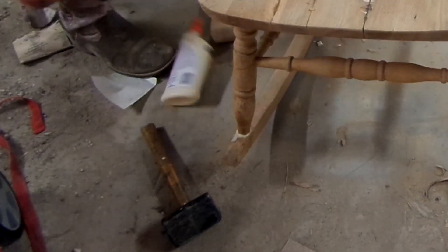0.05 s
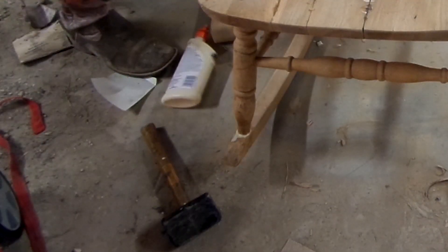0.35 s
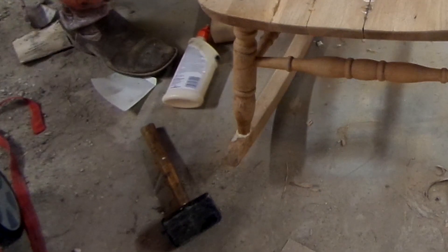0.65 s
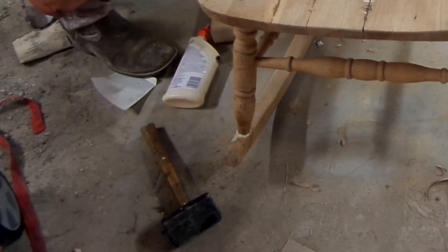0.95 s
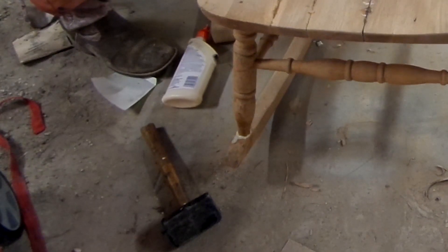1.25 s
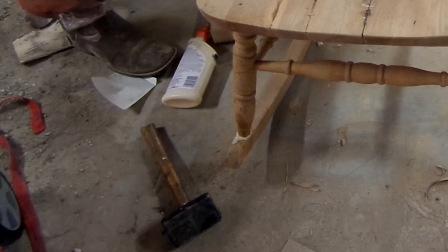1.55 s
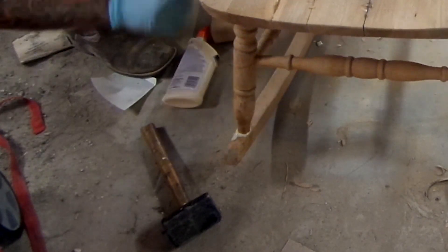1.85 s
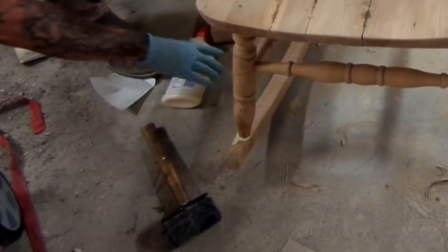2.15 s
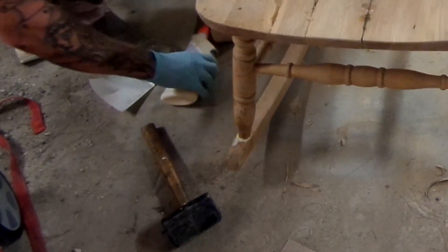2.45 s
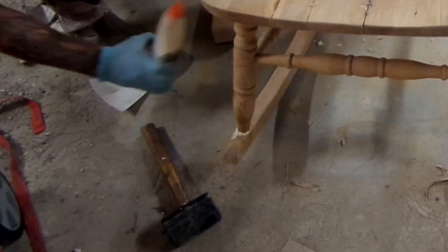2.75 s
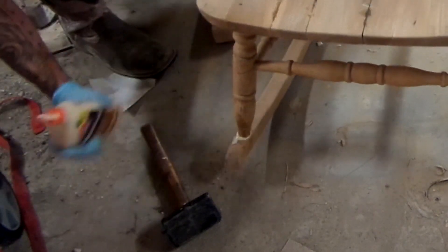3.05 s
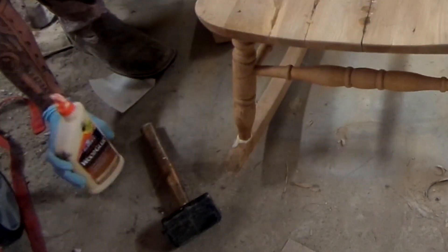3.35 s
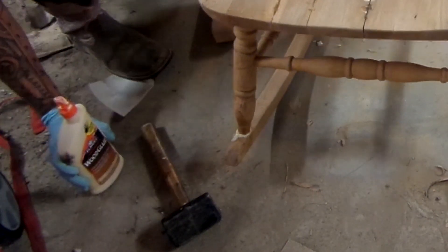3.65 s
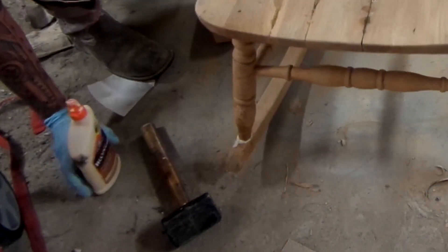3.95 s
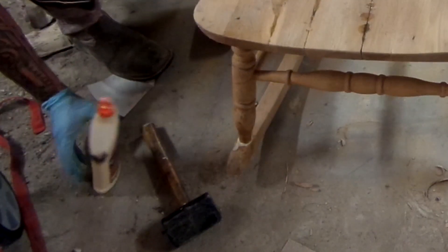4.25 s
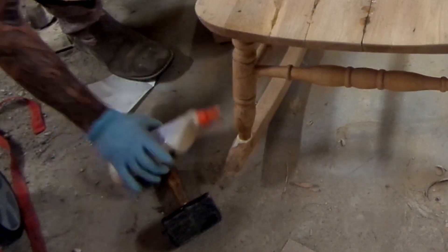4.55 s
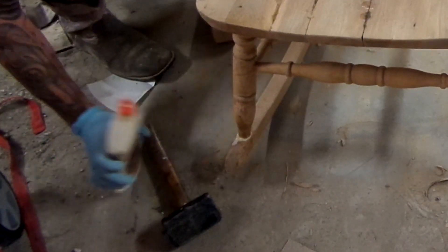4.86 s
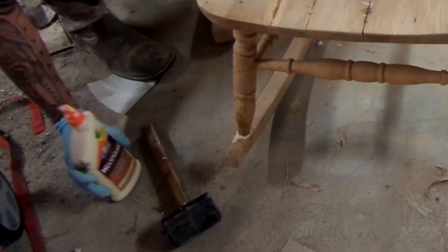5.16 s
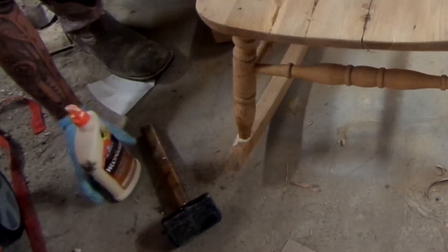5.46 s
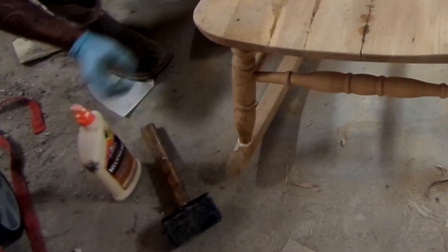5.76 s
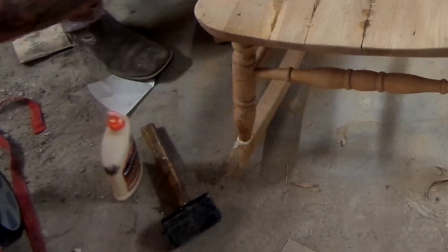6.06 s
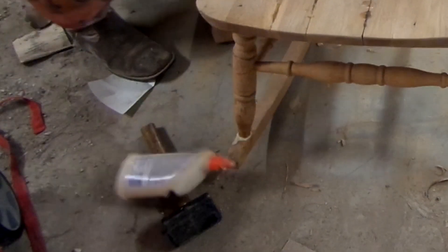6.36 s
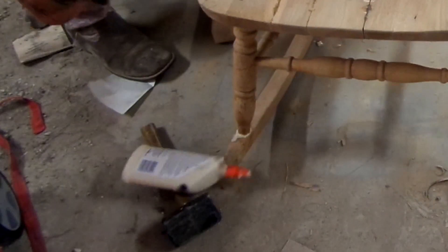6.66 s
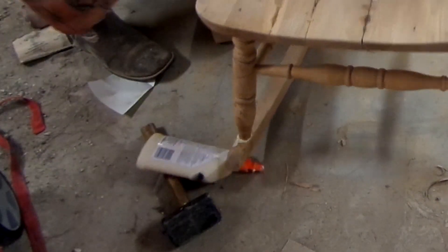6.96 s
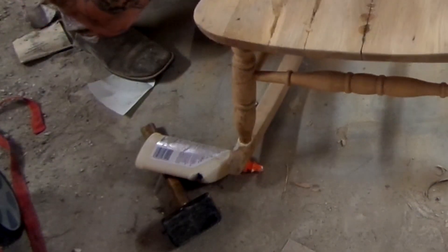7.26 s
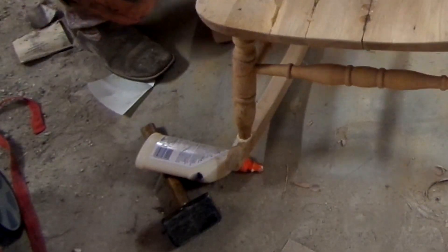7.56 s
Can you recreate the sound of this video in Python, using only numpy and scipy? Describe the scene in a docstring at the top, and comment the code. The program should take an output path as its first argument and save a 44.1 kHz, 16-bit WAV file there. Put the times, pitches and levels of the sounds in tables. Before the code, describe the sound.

A full plastic glue bottle drops on a concrete floor with a hollow thump and rocks to rest. A rubber glove and sleeve rub softly as it is picked up, with tiny gritty snaps. It is set down several times with sharp knocks, then topples onto a wooden mallet handle and clatters until still. The sounds are close, in a hard workshop with a short echo and a faint hum.

```python
"""A workshop with a concrete floor: a full plastic glue bottle drops and rocks, is picked up, is stood
down several times and finally topples onto a wooden mallet handle. Each blow flexes the filled body into
a hollow thump, rings the plastic wall and rim, and cracks on grit; the jolted mallet thuds dully.
A rubber glove and sleeves rub, glove, cap and grit snap, and the hard room rings over a faint hum."""
import sys
import numpy as np
from scipy import signal
from scipy.fft import rfft, irfft, next_fast_len
from scipy.io import wavfile

SR = 44100
rng = np.random.default_rng(int(sys.argv[2]) if len(sys.argv) > 2 else 0)


def inscribe(sig):
    """Save sig as 16-bit PCM at rate SR to the path in sys.argv[1].

    A 1-D sig is mono; a 2-D sig holds one channel per row.
    Samples are clipped to [-1, 1] before scaling.
    """
    pcm = np.round(np.clip(np.atleast_2d(sig).T, -1, 1) * 32767)
    wavfile.write(sys.argv[1], SR, pcm.astype(np.int16))


N = 343971
TIME = np.arange(N) / SR
EVENT_TIME = TIME[:SR * 3 // 4]  # the 0.75 s that one hit, stroke or room tail lasts


def undb(db):
    """Decibels to gain."""
    return 10 ** (np.asarray(db) / 20)


def unit(x):
    """Scale to rms 1."""
    return x / np.sqrt(np.mean(x ** 2))


def peak(x):
    """Scale to peak 1."""
    return x / np.max(np.abs(x))


def add(track, start_s, x):
    """Mix x into the track at its cue."""
    i = int(start_s * SR)
    track[i:i + len(x)] += x[:N - i]


def colour(x, curve):
    """Minimum-phase EQ through (frequency [Hz], gain [dB]) points."""
    size = next_fast_len(len(x) // 2 + 2048, True) * 2
    hz, db = np.transpose(curve)
    log_freq = np.log(np.fft.rfftfreq(size, 1 / SR) + 1)
    cepstrum = irfft(np.log(undb(np.interp(log_freq, np.log(hz), db))))
    # folding the cepstrum keeps the EQ from ringing ahead of a hit
    cepstrum[1:size // 2] *= 2
    cepstrum[size // 2 + 1:] = 0
    return irfft(rfft(x, size) * np.exp(rfft(cepstrum)), size)[:len(x)]


def band(x, lo_hz, hi_hz):
    """Second-order band-pass."""
    return signal.sosfilt(signal.butter(2, [lo_hz, hi_hz], "band", fs=SR, output="sos"), x)


def low_cut(x, hz):
    """Steep high-pass."""
    return signal.sosfilt(signal.butter(4, hz, "high", fs=SR, output="sos"), x)


def fade(t60):
    """Decay envelope that falls 60 dB in t60 seconds."""
    return np.exp(-np.log(1000) * EVENT_TIME / t60)


def damped_sine(hz, t60):
    """One mode ringing out."""
    return fade(t60) * np.sin(2 * np.pi * hz * EVENT_TIME)


def burst(t60):
    """A short crunch of noise."""
    return rng.standard_normal(len(EVENT_TIME)) * fade(t60)


def wander(rate_hz):
    """Smooth random modulation with a spread near 1."""
    steps = rng.standard_normal(int(N / SR * rate_hz) + 2)
    return np.interp(TIME * rate_hz, np.arange(len(steps)), steps)


# EQ of the still air: (frequency [Hz], gain [dB])
AIR_EQ = [(25, -25), (45, -13), (65, -6.5), (85, -10), (130, -11.5), (200, 0), (320, -11.5), (500, -8.5),
          (800, -16), (1500, -18.5), (3000, -20), (8000, -26.5), (16000, -26.5)]
# machine hum and thin whine: (centre [Hz], width [Hz], level [dB])
HUM_BANDS = [(121.9, 11, -61.5), (142.2, 6.5, -70), (501.7, 37, -68), (4095, 195, -67), (7270, 520, -70)]
def room_tone():
    """The bed: steady air, with narrow noise bands that waver as machine hum and whine."""
    air = undb(-56.5) * unit(colour(rng.standard_normal(N), AIR_EQ))
    hum = sum(undb(db) * unit(band(rng.standard_normal(N), hz - width / 2, hz + width / 2))
              for hz, width, db in HUM_BANDS)
    return air + hum


# cue list of bottle blows, shared by thumps, knocks and skids: (time [s], thump level [dB],
# thump pitch [Hz], hollow ring level [dB], wall level [dB], wall centre [Hz], rim level [dB],
# rim centre [Hz], crack level [dB])
BLOWS = [(0.0012, -11, 212, -20, -15.5, 1110, -18, 2200, -13),
         (0.029, -8, 216, -24.5, -20, 910, -28, 2340, -48),
         (0.1809, -27, 260, -22, -20, 800, -26, 1400, -21.5),
         (0.2646, -13.5, 222, -28.5, -24, 507, -46, 2200, -28.5),
         (0.2972, -26.5, 240, -25, -33, 560, -42, 1790, -25.5),
         (0.3513, -47, 212, -29, -41.5, 494, -59, 2200, -39),
         (0.714, -48, 238, -46.5, -41.5, 700, -59, 2200, -45),
         (1.221, -51, 199, -52, -42.5, 610, -51, 2200, -35.5),
         (2.55, -30, 205, -36, -36, 716, -65, 2200, -53),
         (3.4811, -22.5, 295, -29, -27, 670, -35, 2500, -23),
         (3.759, -64, 250, -62, -40.5, 805, -41, 2600, -37),
         (3.844, -66, 210, -70, -45, 760, -38, 3200, -33.5),
         (4.025, -54, 226, -69, -37, 1030, -41.5, 2600, -35),
         (4.5787, -23, 258, -22.5, -15, 840, -24.5, 1900, -5.5),
         (4.607, -17, 220, -22, -28.5, 650, -32, 1500, -40),
         (4.7006, -35, 288, -28.5, -31.5, 570, -36, 2700, -26),
         (5.0733, -33, 269, -39.5, -21, 760, -20, 3240, -18.5),
         (5.1135, -34, 231, -46, -28, 700, -50, 3370, -30),
         (5.195, -40, 266, -44, -43, 700, -46, 3400, -24),
         (5.942, -48, 190, -55, -44, 600, -42.5, 2400, -28.5),
         (6.4382, -24.5, 276, -52, -23.5, 600, -35, 2200, -26),
         (6.456, -13.5, 209, -30, -17.5, 730, -38, 2200, -13),
         (6.4768, -16.5, 211.5, -18, -30, 850, -23.5, 1550, -30),
         (6.5542, -42, 218, -24.5, -27, 630, -44, 1600, -24),
         (6.67, -38, 200, -31.5, -25, 610, -60, 1590, -36),
         (6.7529, -45, 250, -33.5, -37, 1100, -40, 1500, -29.5),
         (6.786, -36, 250, -30.5, -31, 480, -40, 1500, -45),
         (6.859, -24, 204, -20.5, -23, 1230, -42, 1300, -32),
         (6.9319, -19.5, 228.5, -31, -44, 485, -62, 3400, -45),
         (7.022, -38, 253, -49, -59, 600, -64, 1500, -52),
         (7.193, -54, 223, -43.5, -40, 900, -63, 1480, -63),
         (7.305, -45, 245, -49, -60, 600, -66, 1500, -36)]
# the filled bottle's lingering low modes: (frequency [Hz], relative level [dB], t60 [s])
BODY_MODES = [(188.2, -10.5, 0.5), (201.5, 1, .31), (223.4, -5.5, 0.42), (253.6, 0.5, 0.56),
              (281.6, -5.5, 0.17), (349.3, -9.5, 0.34), (421, -8.5, 0.31)]
def bottle_thumps():
    """Each blow flexes the glue-filled body for a few cycles and leaves its low modes ringing."""
    out = np.zeros(N)
    attack_s = 0.0025
    spot_db_per_octave = -10.5  # modes far from the pitch of the struck spot are excited less
    for start_s, thump_db, thump_hz, ring_db, *_ in BLOWS:
        thump = (1 - np.exp(-EVENT_TIME / attack_s)) * damped_sine(thump_hz, t60=0.125)
        hollow = sum(undb(db + spot_db_per_octave * abs(np.log2(hz / thump_hz))) * damped_sine(hz, t60)
                     for hz, db, t60 in BODY_MODES)
        add(out, start_s, undb(thump_db) * thump + undb(ring_db) * hollow)
    return low_cut(out, hz=179)


def contact(t60):
    """One hard click, with a crunch of grit 5 dB under it."""
    grit = burst(t60) * rng.exponential(size=len(EVENT_TIME))
    force = undb(-5) * grit / np.linalg.norm(grit)
    force[0] += 1
    return force


def strike(modes, scatter_db, detune):
    """Struck modes; each blow lands on another spot and shifts their balance and pitch."""
    out = np.zeros(len(EVENT_TIME))
    for k, (hz, db, t60) in enumerate(modes):
        gain = undb(db + scatter_db * rng.standard_normal())
        pitch_hz = hz * (1 + detune * rng.standard_normal())
        out += (-1) ** k * gain * damped_sine(pitch_hz, t60)
    return peak(out)


def plastic(modes, cycles):
    """Lossy plastic: every mode falls 60 dB in the same number of cycles."""
    return [(hz, db, cycles / hz) for hz, db in modes]


# modes of the plastic walls: (frequency [Hz], relative level [dB])
WALL_MODES = [(548, 7.5), (630, 6.5), (684, 5.5), (835, 6), (867, 7.5), (958, 2.5), (1063, 7.5),
              (1160, 12.5), (1220, 13), (1320, 8.5)]
# modes of the stiff rim and cap: (frequency [Hz], relative level [dB])
RIM_MODES = [(1555, 12.5), (1790, 11), (2010, 14), (2180, 9.5), (2305, 14), (2380, 10.5), (2800, 7),
             (3400, 7), (3570, 4.5)]
# EQ of the crack on the floor: (frequency [Hz], gain [dB])
CRACK_EQ = [(1500, -9), (3500, 6), (5500, 14.5), (8000, 5.5), (12000, -6), (16000, 5.5)]
def bottle_knocks():
    """Each blow knocks the bottle's wall, clacks its rim and cracks on the gritty floor."""
    out = np.zeros(N)
    for start_s, *_, wall_db, wall_hz, rim_db, rim_hz, crack_db in BLOWS:
        wall = strike(plastic(WALL_MODES, cycles=21.3), scatter_db=3.5, detune=0.0061)
        wall += undb(-1) * peak(band(contact(t60=0.015), 470, 2250))
        rim = strike(plastic(RIM_MODES, cycles=67), scatter_db=1.0, detune=0.0067)
        rim += undb(9) * peak(band(contact(t60=0.045), 1700, 4800))
        # the struck spot favours the modes around one pitch
        wall = peak(colour(wall, [(wall_hz / 2, -5), (wall_hz, 0), (wall_hz * 2, -9)]))
        rim = peak(colour(rim, [(rim_hz / 1.5, -12), (rim_hz, 0), (rim_hz * 1.5, -12)]))
        crack = peak(colour(contact(t60=0.043), CRACK_EQ))
        add(out, start_s, undb(wall_db) * wall + undb(rim_db) * rim + undb(crack_db) * crack)
    return out


def friction(eq, grain_db, flutter_db=1.8):
    """Dense micro-slips of unequal size, coming in uneven spurts."""
    slips = rng.standard_normal(N)
    slips *= undb(grain_db * np.minimum(rng.exponential(size=N), 2 * np.pi))
    return unit(colour(slips, eq)) * undb(flutter_db * wander(rate_hz=120))


def shifting_contact(hiss, tilt_db):
    """As the contact patch moves, the hiss swings between duller and brighter."""
    bright = signal.sosfilt(signal.butter(1, 7500, "high", fs=SR, output="sos"), hiss)
    tilt = undb(tilt_db * wander(rate_hz=28))
    return bright * tilt + (hiss - bright) / tilt


# bright EQ of grit ticks and snaps: (frequency [Hz], gain [dB])
SNAP_EQ = [(1000, -24), (3500, -10), (6000, -2), (10000, 0), (16000, 0)]
def grit_ticks(per_second):
    """Grains of grit catch as sparse bright ticks of unequal size."""
    catches = (rng.random(N) < per_second / SR) * rng.standard_normal(N)
    tick = peak(colour(burst(t60=0.002), SNAP_EQ))
    return signal.fftconvolve(catches, tick)[:N]


# fader curve of the sleeve's rustle as the arm moves: (time [s], level [dB])
SLEEVE_FADER = [(0.45, -77), (0.82, -69), (3.57, -57.5), (4.59, -93), (4.75, -59.5), (5.46, -61),
                (5.71, -71), (6.28, -63), (6.48, -68), (6.75, -58.5), (6.99, -61), (7.5, -61)]
# glove over bottle, bottle over floor: (time [s], length [s], hiss level [dB], scrape level [dB])
RUB_STROKES = [(0.05, .04, -42, -42), (0.71, .04, -55, -53), (0.81, .19, -55, -72), (1.38, .13, -56, -58),
               (1.59, .05, -55, -65), (1.712, .04, -46, -52), (1.78, .16, -55, -62), (2.0, .08, -54, -55),
               (2.235, .03, -56, -53), (2.42, .21, -45, -51), (3.31, .04, -48, -57), (3.38, .14, -48, -56),
               (3.53, .07, -52, -52), (3.775, .07, -62, -54), (3.91, .12, -54, -65), (4.1, .11, -57, -74),
               (4.62, .09, -46, -47), (4.812, .035, -40.5, -41), (5.02, .04, -41, -48),
               (5.285, .05, -47, -45), (5.41, .08, -51, -58), (5.57, .05, -55, -63), (6.255, .14, -49, -58),
               (6.56, .11, -42, -50), (6.77, .05, -46, -52), (6.91, .03, -48, -48), (7.11, .15, -54, -61),
               (7.515, .09, -55, -66)]
# EQ of light rubbing: (frequency [Hz], gain [dB])
HISS_EQ = [(1000, -24), (3000, -9), (5500, 0), (8000, -1), (11000, 0), (16000, -1)]
# EQ of pressed rubbing: (frequency [Hz], gain [dB])
SCRAPE_EQ = [(60, -50), (250, 5), (600, -3), (1100, -4.5), (2400, -1.5), (3500, -2), (5500, -9.5),
             (12000, -20.5)]
def rubbing():
    """Friction: the sleeve only hisses; strokes and skids press harder and also scrape lower down."""
    hiss_env = undb(np.interp(TIME, *np.transpose(SLEEVE_FADER)))
    scrape_env = np.zeros(N)
    swell_share, sag_db, release_s = 0.51, -5.5, 0.047
    for start_s, length_s, hiss_db, scrape_db in RUB_STROKES:
        swell = np.minimum(EVENT_TIME / (swell_share * length_s), 1)
        pressure = undb(sag_db * (np.minimum(EVENT_TIME / length_s, 1) - .5))
        release = np.exp(-np.maximum(EVENT_TIME - length_s, 0) / release_s)
        stroke = swell * pressure * release
        add(hiss_env, start_s, undb(hiss_db) * stroke)
        add(scrape_env, start_s, undb(scrape_db) * stroke)
    # every blow skids briefly on the grit, well under its crack
    skid = np.exp(-EVENT_TIME / 0.029)
    for start_s, *_, crack_db in BLOWS:
        add(hiss_env, start_s, undb(crack_db - 25) * skid)
        add(scrape_env, start_s, undb(crack_db - 24) * skid)
    hiss = shifting_contact(friction(HISS_EQ, grain_db=3.0), tilt_db=3.0)
    hiss += undb(7.5) * grit_ticks(per_second=28)
    scrape = friction(SCRAPE_EQ, grain_db=0.5)
    return hiss_env * hiss + scrape_env * scrape


# small sharp snaps of glove, cap and grit: (time [s], snap level [dB], clack level [dB])
SNAP_CUES = [(0.0567, -15, -37), (0.083, -26, -44), (0.606, -38, -38), (0.7218, -42, -39),
             (1.385, -31.5, -51), (1.899, -35, -50), (2.067, -50, -56), (2.2393, -25, -16.5),
             (2.46, -30, -33), (3.3252, -17.5, -30.5), (4.8433, -23.5, -20.5), (5.0435, -19.5, -36),
             (5.1137, -31, -21.5), (5.2725, -46, -27), (5.3, -35, -21.5), (5.511, -28, -47),
             (5.758, -34.5, -53), (5.901, -28, -57), (6.042, -34, -54), (6.2485, -29, -56),
             (6.2855, -24.5, -49), (6.584, -25, -27), (6.913, -18, -27.5)]
# EQ of the plastic's clack: (frequency [Hz], gain [dB])
CLACK_EQ = [(100, -22), (350, -3), (620, 2), (1200, -4), (2000, -3), (2900, -2), (4200, -4.5), (8000, -12),
            (16000, -20)]
def handling_snaps():
    """Glove, cap and grit give tiny bright snaps, each layered with a clack of the plastic."""
    out = np.zeros(N)
    for start_s, snap_db, clack_db in SNAP_CUES:
        snap = peak(colour(burst(t60=0.007), SNAP_EQ))
        clack = peak(colour(contact(t60=0.007), CLACK_EQ))
        add(out, start_s, undb(snap_db) * snap + undb(clack_db) * clack)
    return out


# the thin ring heard at the lift: (centre [Hz], level [dB], t60 [s])
LIFT_TONE = (2363, -48, 0.42)
def lift_ring(start_s):
    """A narrow band of noise rings faintly as the bottle comes up."""
    out = np.zeros(N)
    hz, db, t60 = LIFT_TONE
    add(out, start_s, undb(db) * peak(band(burst(t60), hz - 50, hz + 50)))
    return out


# the bottle jolts the mallet against the floor: (time [s], level [dB])
MALLET_JOLTS = [(4.58, -34.5), (4.623, -34), (6.459, -31.5), (6.672, -35), (6.754, -37)]
# the mallet's dull modes: (frequency [Hz], relative level [dB], t60 [s])
MALLET_MODES = [(48, -15, .3), (66, -5, .3), (90, -3, .2), (122, -3, .25), (145, 0, .3)]
def mallet_thuds():
    """The heavy mallet rocks on the concrete with a dull thud."""
    out = np.zeros(N)
    for start_s, db in MALLET_JOLTS:
        thud = strike(MALLET_MODES, scatter_db=7.0, detune=0.033)
        add(out, start_s, undb(db) * low_cut(thud, hz=50))
    return out


# reverb time of the workshop: (frequency [Hz], t60 [s])
ROOM_DECAY = [(100, 1), (300, 0.72), (1000, 0.65), (3000, 0.52), (8000, 0.32), (16000, 0.11)]
def room_reverb(send, bass_db, build_s):
    """Hard walls: single echoes at first, thickening into a diffuse ring whose treble dies soonest."""
    size = len(EVENT_TIME)
    density = np.clip((EVENT_TIME / build_s) ** 2, .01, 1)
    echoes = rng.standard_normal(size) * (rng.random(size) < density) / np.sqrt(density)
    freq = np.fft.rfftfreq(size, 1 / SR)
    edges_hz = np.geomspace(60, 20000, 10)
    tail = np.zeros(size)
    for lo, hi in zip(edges_hz, edges_hz[1:]):
        t60 = np.interp(np.sqrt(lo * hi), *np.transpose(ROOM_DECAY))
        tail += irfft(rfft(echoes) * (freq >= lo) * (freq < hi), size) * fade(t60)
    attack = 1 - np.exp(-EVENT_TIME / 0.00054)
    tail = colour(tail * attack, [(250, bass_db), (360, 0)])
    return signal.fftconvolve(send, tail / np.linalg.norm(tail))[:N]


def scene():
    """Mono mix: thumps, knocks, snaps and rubbing feed the reverb; room tone and lift ring stay dry."""
    thumps = bottle_thumps()
    knocks = bottle_knocks() + mallet_thuds()
    snaps = handling_snaps()
    rub = rubbing()
    send = undb(-14) * thumps + undb(-2.5) * knocks + undb(-0.5) * snaps + undb(-6.5) * rub
    reverb = room_reverb(send, bass_db=-3.5, build_s=0.037)
    return (thumps + knocks + snaps + rub + reverb + room_tone() + lift_ring(start_s=2.61))[None]


def record(dry):
    """The small microphone drops the deep bass; a steep high cut takes off the top."""
    high_cut = signal.ellip(10, .2, 70, 15900, fs=SR, output="sos")
    return signal.sosfilt(high_cut, low_cut(dry, hz=36.5))


dry = scene()
out = record(dry)
inscribe(out)
```